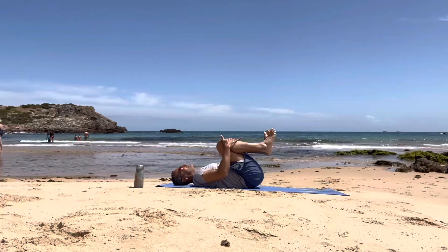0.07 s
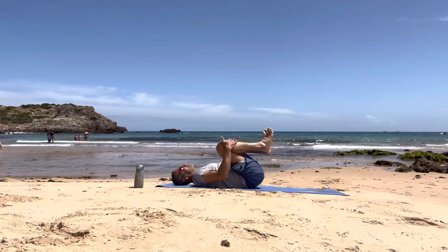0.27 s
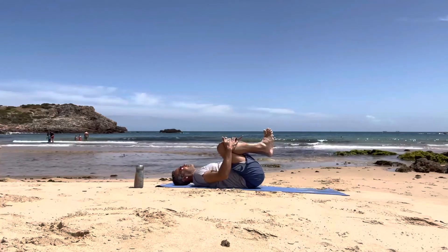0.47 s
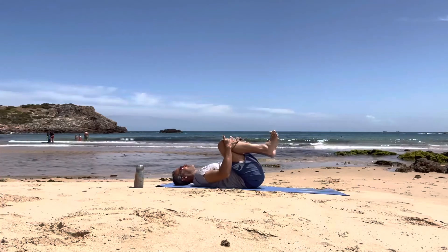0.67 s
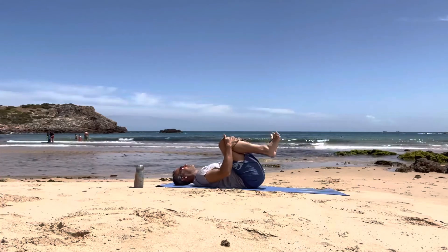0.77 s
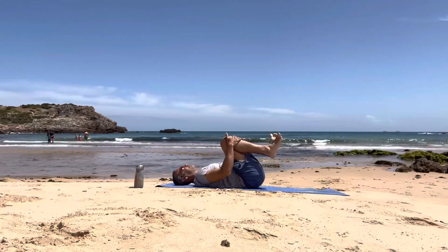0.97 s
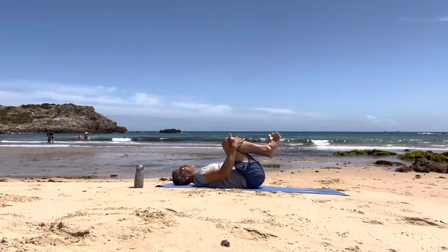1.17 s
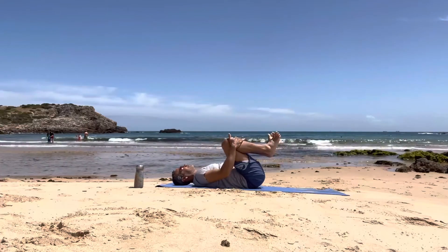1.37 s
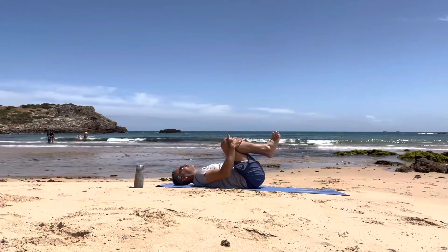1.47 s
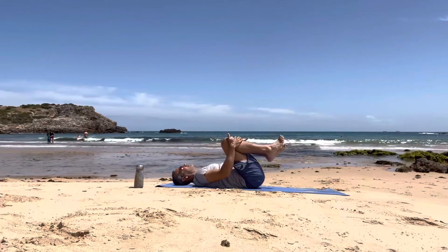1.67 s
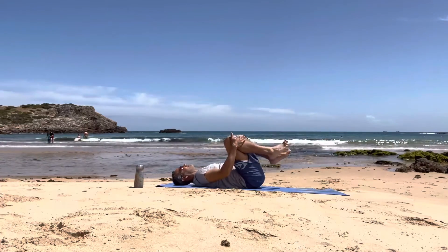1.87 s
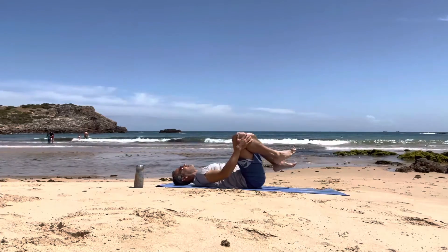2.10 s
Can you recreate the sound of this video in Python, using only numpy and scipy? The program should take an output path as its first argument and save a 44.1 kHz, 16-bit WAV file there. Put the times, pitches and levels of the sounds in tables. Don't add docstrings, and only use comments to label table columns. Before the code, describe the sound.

Sea waves wash and hiss ashore, with low uneven wind buffeting, after a brief silent start

```python
import sys
import numpy as np
from scipy import signal
from scipy.fft import rfft, irfft, next_fast_len
from scipy.io import wavfile
from scipy.ndimage import uniform_filter1d, map_coordinates

SR = 44100
rng = np.random.default_rng(int(sys.argv[2]) if len(sys.argv) > 2 else 0)


def dump_mix(stems):
    frames = np.atleast_2d(stems).T
    limited = np.clip(frames, -1, 1)
    pcm = np.round(limited * 32767).astype(np.int16)
    wavfile.write(sys.argv[1], SR, pcm)


def level_to_linear(level):
    exponent = np.asarray(level, float) / 20
    return 10 ** exponent


N = 94153


def unit(x):
    return x / np.sqrt(np.mean(x ** 2) + 1e-20)


def curve(rows):
    return np.interp(np.arange(N) / SR, *np.transpose(rows))


def wobble(rate_hz):
    return map_coordinates(rng.standard_normal(400), [np.arange(N) * rate_hz / SR])


def coloured(x, spectrum):
    length = next_fast_len(N + 8192)
    hz, db = np.transpose(spectrum)
    bin_hz = np.fft.rfftfreq(length, 1 / SR)
    gain = level_to_linear(np.interp(np.log(bin_hz + 1), np.log(hz + 1), db))
    return unit(irfft(rfft(x, length) * gain, length)[:N])


def rush(spectrum, patchy_db):
    cells = signal.stft(rng.standard_normal(N), nperseg=512)[2]
    patches = uniform_filter1d(rng.standard_normal(cells.shape), size=8, axis=0)
    patches = uniform_filter1d(patches, size=11, axis=1)
    patchy = signal.istft(cells * level_to_linear(patchy_db * unit(patches)), nperseg=512)[1][:N]
    return coloured(patchy, spectrum)


def grains(count, size, hz, spread, cycles, scatter_db):
    luck = rng.random((count, 2))
    pitch_hz = hz * np.exp(np.clip(spread * rng.standard_normal((count, 1)), -1, .3))
    phase = pitch_hz * np.arange(size) / SR
    wave = np.sin(2 * np.pi * phase * (1 + 0.063 * phase / cycles))
    wave *= np.exp(-3 * phase / cycles) * (1 - np.exp(-.7 * phase))
    loudness = level_to_linear(scatter_db * np.minimum(-np.log(1 - luck[:, 1:]), 3))
    wave = wave * loudness * np.linspace(1, 0, size)
    where = (luck[:, :1] * N).astype(int) + np.arange(size)
    return unit(np.bincount(where.ravel(), wave.ravel())[:N])


def far_surf():
    # start_s [s], level_db [dB]
    strength = [(.252, -54), (.29, -50.5), (.4, -52.5), (.48, -51.5), (.62, -53), (.85, -52), (1.1, -52.5),
                (1.3, -53), (1.5, -51), (1.75, -50), (1.92, -50.5), (2.13, -50.5)]
    # pitch_hz [Hz], level_db [dB per Hz]
    roar = [(40, -28), (80, -6), (300, -5), (1120, -2.5), (2200, -8.5), (5000, -21.5), (7500, -28.5),
            (12500, -38.5)]
    trim_db = 3.5
    level_db = curve(strength) + trim_db + .25 * wobble(14.0)
    return level_to_linear(level_db) * rush(roar, patchy_db=.7)


def swash():
    # start_s [s], level_db [dB]
    strength = [
        (.26, -60),
        (.42, -61.5),
        (.62, -62),
        (.7, -58.5),
        (.93, -57.5),
        (1.1, -58),
        (1.29, -65.5),
        (1.5, -62),
        (2.13, -61.5),
    ]
    # pitch_hz [Hz], level_db [dB per Hz]
    hiss = [(1800, -29), (2900, -7), (4200, -5.5), (5600, -10.5), (8000, -30.5), (11900, -19.5),
            (14000, -26), (15700, -38)]
    trim_db = -2
    level_db = curve(strength) + trim_db + 0.43 * wobble(14.9)
    return level_to_linear(level_db) * rush(hiss, patchy_db=2.4)


def foam():
    # start_s [s], level_db [dB]
    strength = [
        (.26, -72),
        (.33, -70),
        (.5, -74),
        (1.0, -77.5),
        (1.34, -73.5),
        (1.47, -68),
        (1.56, -73),
        (1.68, -66),
        (2.13, -67),
    ]
    # pitch_hz [Hz], level_db [dB per Hz]
    sizzle = [(4500, -46), (7000, -11), (8500, -4.5), (10000, -7.5), (11500, -13.5), (13500, -26),
              (15500, -40)]
    # start_s [s], peak level_db [dB], pitch_hz [Hz]
    pops = [(.260, -50, 4620), (.317, -56, 7240), (.321, -51, 5270), (.333, -59, 10000), (.399, -57, 8500),
            (.447, -57, 8100), (.702, -58, 9600), (.735, -56, 7100), (.862, -57, 5730), (1.046, -58, 5630),
            (1.073, -65, 10500), (1.145, -63, 8500), (1.310, -68, 8800), (1.658, -60, 5800),
            (1.964, -58, 7200)]
    trim_db, bubbles_db, pop_t60_s = -0.5, -12, .006
    bubbles = grains(count=8000, size=80, hz=8800, spread=0.29, cycles=6, scatter_db=5.0)
    level_db = curve(strength) + trim_db + 0.56 * wobble(13.5)
    fizz = level_to_linear(level_db) * (rush(sizzle, patchy_db=0.5) + level_to_linear(bubbles_db) * bubbles)
    t = np.arange(800) / SR
    for start_s, peak_db, pitch_hz in pops:
        fade = level_to_linear(peak_db + 8 - 60 * t / pop_t60_s) * (1 - np.exp(-t / .0002))
        tone = np.sin(2 * np.pi * pitch_hz * t * (0.87 + 80 * t))
        fizz[round(start_s * SR):][:len(t)] += fade * tone
    return fizz


def breaker():
    # start_s [s], level_db [dB]
    strength = [(.26, -58), (.31, -49.5), (.42, -55.5), (.6, -53.5), (.9, -53.5), (1.05, -56.5),
                (1.16, -49), (1.4, -53.5), (1.65, -51), (1.85, -48.5), (2.08, -45.5), (2.13, -46.5)]
    # pitch_hz [Hz], level_db [dB per Hz]
    tumble = [(50, -37), (110, -6), (250, -4), (600, -3.5), (1100, -11.5), (2200, -21), (5000, -56)]
    trim_db, bubbles_db = -2, -2.5
    bubbles = grains(count=3400, size=1400, hz=558, spread=.45, cycles=9.5, scatter_db=4.5)
    level_db = curve(strength) + trim_db + 0.47 * wobble(13.12)
    return level_to_linear(level_db) * (rush(tumble, patchy_db=1.8) + level_to_linear(bubbles_db) * bubbles)


def wind():
    # start_s [s], level_db [dB], eddies shed per second [Hz]
    gusts = np.array([(.26, -47.5, 20.5), (.44, -61, 21), (.53, -43, 13.2), (.62, -46, 9.3),
                      (.73, -43, 15.2), (.86, -49, 13.7), (.99, -40, 14.8), (1.05, -49, 27.5),
                      (1.2, -38, 22), (1.35, -47, 20.2), (1.46, -52.5, 24), (1.55, -38.5, 16.1),
                      (1.64, -38, 12.7), (1.76, -56, 18), (1.85, -45.5, 17), (1.97, -46, 12.7),
                      (2.13, -45, 14)])
    # pitch_hz [Hz], level_db [dB per Hz]
    eddies = [(2, -6), (5, 4), (30, 2), (60, -2), (110, -19), (160, -46), (300, -120)]
    swing_trim_db, rough_trim_db = -3.5, -3
    rough_follows = .6
    faster_db = 4
    strength_db, shed_hz = curve(gusts[:, :2]), curve(gusts[:, ::2])

    uneven_hz = shed_hz * np.exp(0.1116 * wobble(14.0))
    swings = np.sqrt(2) * np.sin(2 * np.pi * np.cumsum(uneven_hz) / SR)

    rough_db = wobble(22.0) + faster_db * np.log2(shed_hz / shed_hz.mean())
    rough = coloured(level_to_linear(rough_db) * rng.standard_normal(N), eddies)
    mean_db = strength_db.mean()
    rough_level_db = mean_db + rough_trim_db + rough_follows * (strength_db - mean_db)
    return level_to_linear(strength_db + swing_trim_db) * swings + level_to_linear(rough_level_db) * rough


def scene():
    return (far_surf() + swash() + foam() + breaker() + wind())[None]


def roll_off(x):
    return signal.sosfilt(signal.butter(12, 15590, fs=SR, output="sos"), x)


def record(dry):
    # pitch_hz [Hz], level_db [dB per Hz]
    idle_tone = [(3, 1), (25, -1), (60, -11), (200, -21.5), (13500, -26.5), (14500, -45), (22000, -60)]
    # pitch_hz [Hz], level_db [dB per Hz]
    tick_tone = [(300, -25), (1000, 0), (4700, -5), (7000, -6), (13500, -8), (15500, -27), (22000, -60)]
    # pitch_hz [Hz], level_db [dB]
    port = [(20, 1), (12500, -1.5), (14800, -5), (15700, -17), (22000, -57)]
    switch_on_s, switch_rise_s = .2512, .0004
    offset_db, noise_db = -88.5, -93
    tick_s, tick_width_s, tick_db = .2400, .0028, -82
    t = np.arange(N) / SR
    tick_shape = np.exp(-((t - tick_s) / tick_width_s) ** 4)
    tick = level_to_linear(tick_db) * tick_shape * coloured(rng.standard_normal(N), tick_tone)
    idle = level_to_linear(offset_db) + level_to_linear(noise_db) * coloured(rng.standard_normal(N), idle_tone)
    heard = coloured(dry[0], port) * dry.std()
    opening = np.clip((t - switch_on_s) / switch_rise_s, 0, 1)
    mix = heard * opening + idle + tick
    return roll_off(mix[None])


dry = scene()
out = record(dry)
dump_mix(out)
```